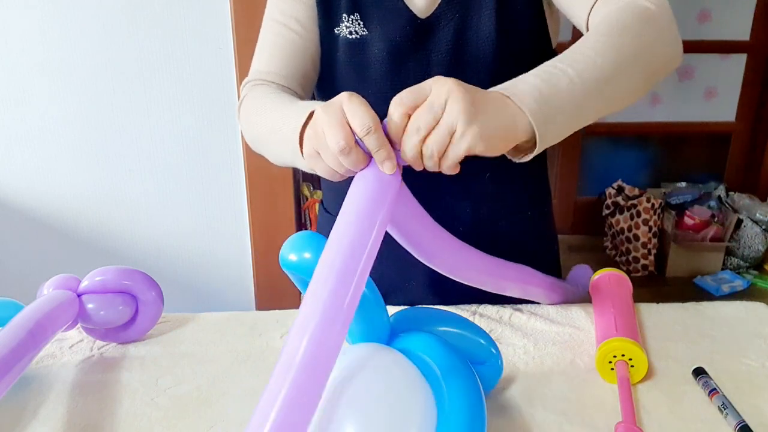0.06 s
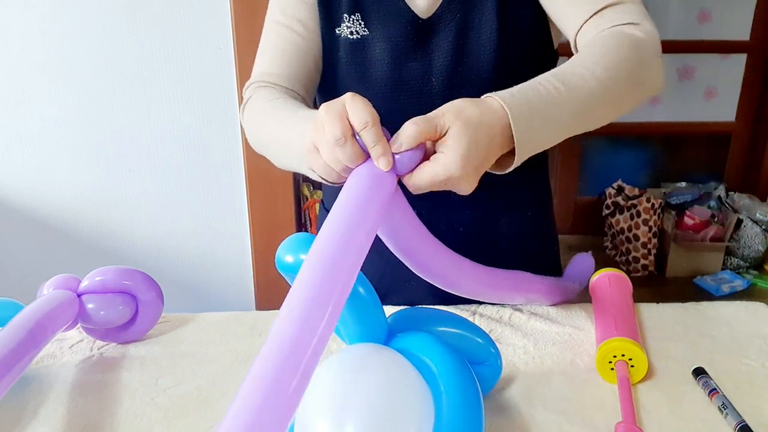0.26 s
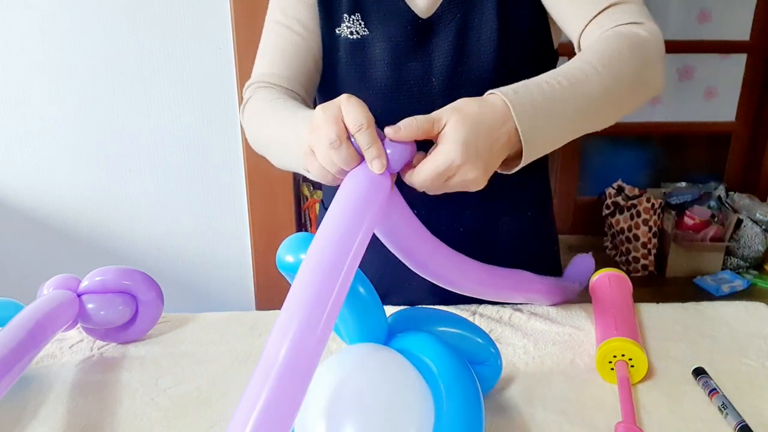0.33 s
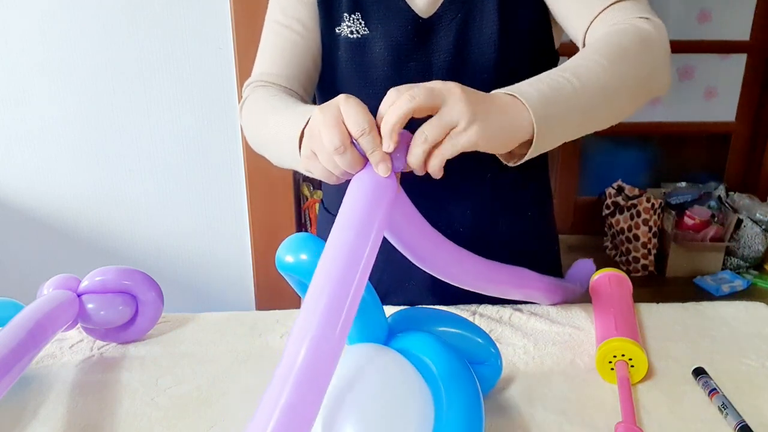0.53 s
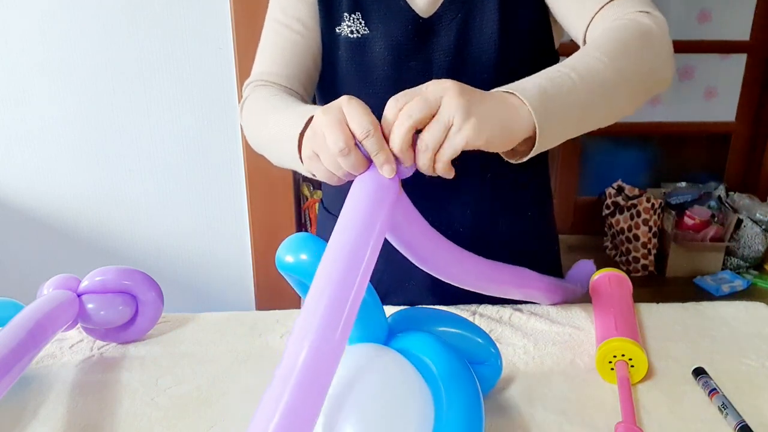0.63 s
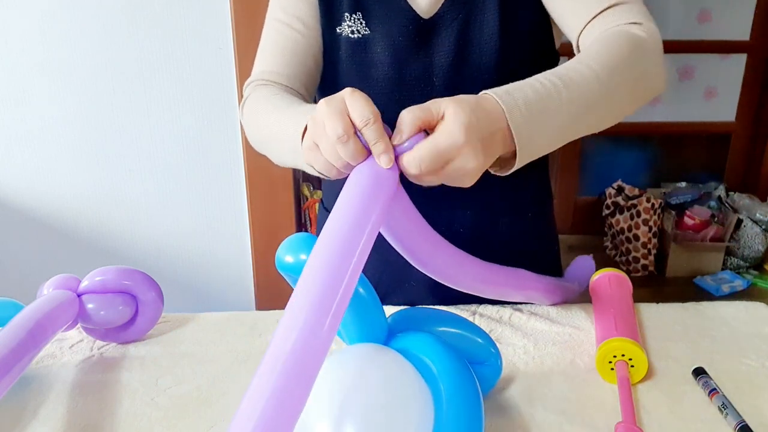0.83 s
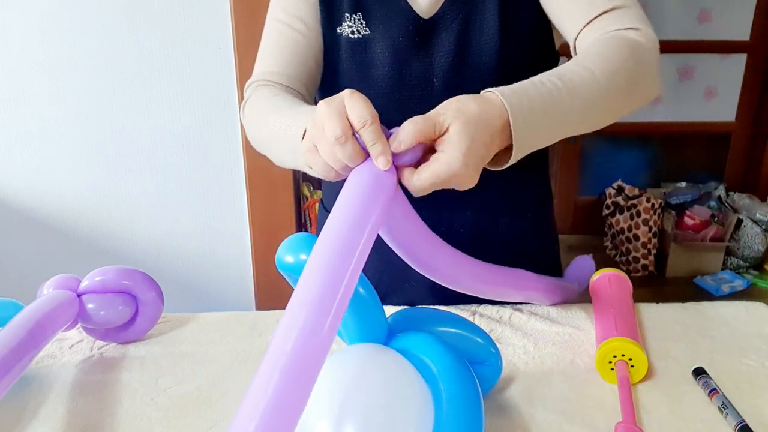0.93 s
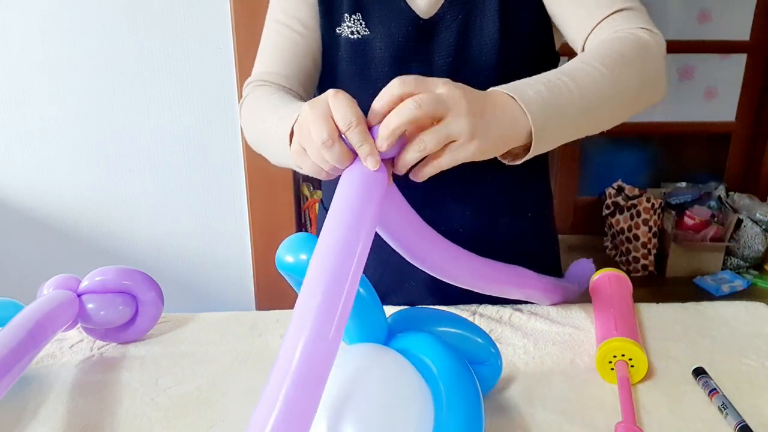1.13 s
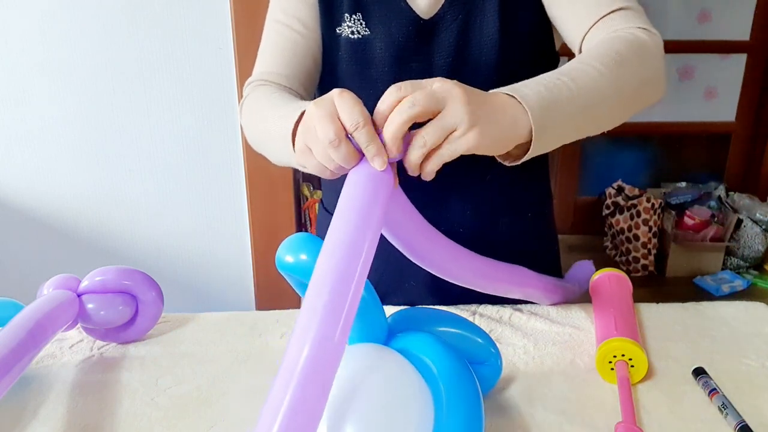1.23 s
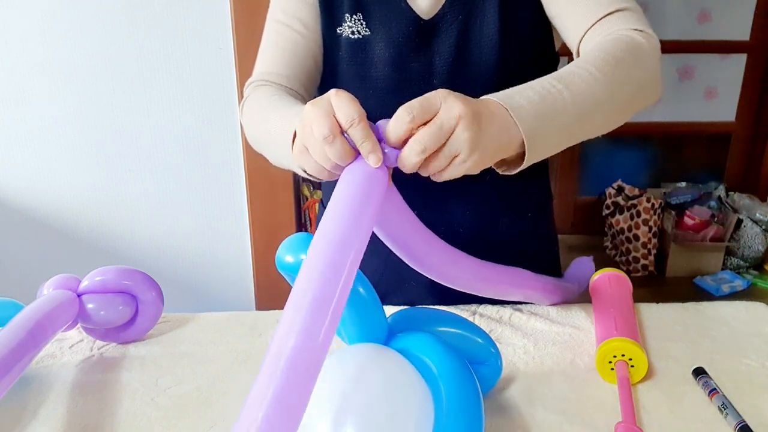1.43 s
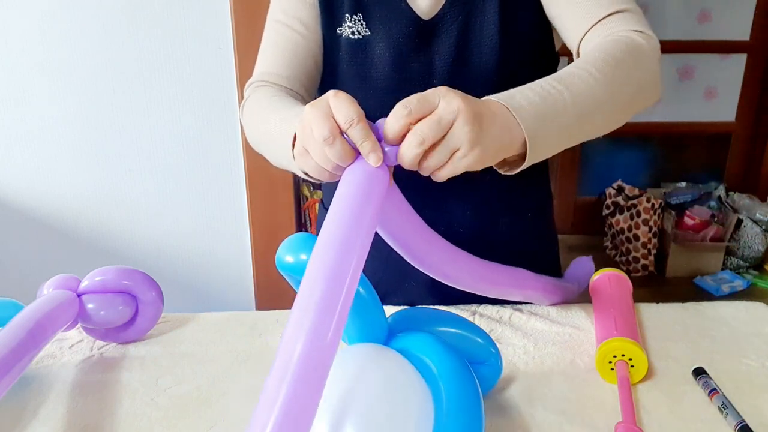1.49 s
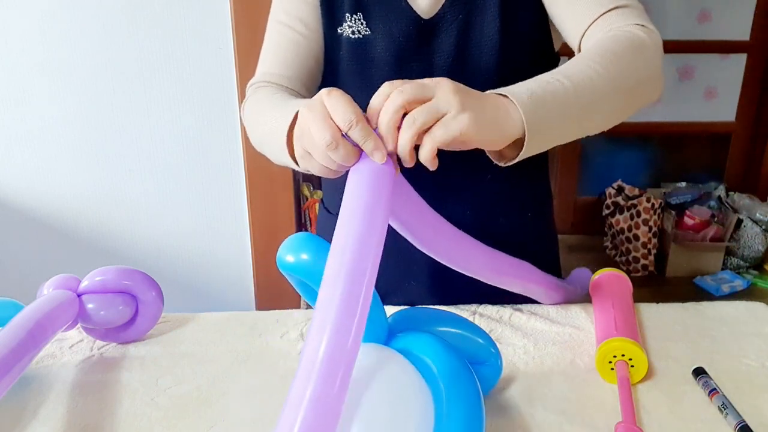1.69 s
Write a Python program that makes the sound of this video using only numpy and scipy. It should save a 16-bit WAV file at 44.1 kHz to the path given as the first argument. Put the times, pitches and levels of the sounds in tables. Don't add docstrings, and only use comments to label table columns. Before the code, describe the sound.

A long rubber balloon twisted by hand, snapping and squeaking in sharp irregular bursts indoors

```python
import sys
import numpy as np
from scipy import signal
from scipy.fft import rfft, irfft
from scipy.io import wavfile
from scipy.ndimage import uniform_filter1d

SR = 44100
rng = np.random.default_rng(int(sys.argv[2]) if len(sys.argv) > 2 else 0)


def how_loud(loudness_db):
    steps = np.asarray(loudness_db, float) / 20
    return 10 ** steps


def int16_out(signal):
    q = np.round(np.clip(np.atleast_2d(signal).T, -1, 1) * 32767)
    wavfile.write(sys.argv[1], SR, q.astype(np.int16))


N = 77175


def evened(x):
    return x / np.sqrt(np.mean(x ** 2) + 1e-20)


def read(points, hz):
    f, value = np.transpose(points)
    return np.interp(np.log(hz + 1), np.log(f + 1), value)


def add(mix, start_s, sound):
    part = mix[max(round(start_s * SR), 0):][:len(sound)]
    part += sound[:len(part)]


def highpass(x, hz):
    return signal.lfilter(*signal.butter(2, hz, "high", fs=SR), x)


def skin(pitch_hz, treble_db, size=512):
    # f/Hz at 2400 Hz pitch, level/dB
    body = [(100, -52), (400, -25), (800, -9), (1400, -2), (3300, 0), (5000, -9), (7000, -11), (9000, -25)]
    # f/Hz, level/dB
    tick = [(3000, -15), (5000, -6.5), (6600, -3.5), (7900, 1), (8600, -13.5), (11000, -10), (15500, -15),
            (17000, -7.5)]
    q, upper_ratio, upper_db, body_db, tick_db = 4.5, 1.55, -8, -10, treble_db - 3.5
    f = abs(np.fft.fftfreq(4 * size, 1 / SR)) + 1

    def mode(hz):
        return 1 / (1 + (q * (f / hz - hz / f)) ** 2)

    power = mode(pitch_hz) + how_loud(2 * upper_db) * mode(pitch_hz * upper_ratio) ** 2
    power = power / (1 + (pitch_hz / 2 / f) ** 4)
    power = power / (1 + (f / pitch_hz / 2) ** 2)
    power = power + how_loud(2 * (body_db + read(body, f * np.sqrt(2400 / pitch_hz))))
    power = power + how_loud(2 * (tick_db + read(tick, f)))
    spectrum = np.exp(np.conj(signal.hilbert(np.log(power) / 2)))
    return np.fft.ifft(spectrum).real[:size]


def snaps():
    # t/s, peak/dB, skin pitch f/Hz, treble/dB
    twists = [(.002, -40, 3800, -4), (.006, -32, 2100, -4), (0.018, -39, 3500, -13), (.038, -20.5, 4000, -2),
              (0.056, -32, 4000, -7), (.068, -34, 4100, -8), (.088, -38, 3000, -12), (0.094, -36, 3200, 8),
              (0.043, -23, 3000, 0.5), (.080, -32.5, 2960, -5), (0.111, -39, 2980, -15),
              (.123, -30, 3040, 4), (0.147, -40, 2800, -14), (.156, -30, 2170, -1), (.162, -39, 2000, -1),
              (0.1668, -25.5, 1490, -7), (.170, -37, 3000, 0), (0.177, -29.5, 2900, -12),
              (0.184, -38, 3000, -13), (0.191, -22.5, 2430, -8), (0.197, -24, 1700, 11),
              (0.2008, -21.5, 1800, -12), (0.2103, -10.5, 2480, -8), (0.217, -15, 2000, 2),
              (.2233, -3.5, 1870, -11), (.246, -11, 2530, 12), (.2665, -20, 2000, 10),
              (0.3456, -22, 1720, -16), (0.351, -20.5, 1540, -14), (.3542, -4, 2680, -5.5),
              (.3546, -16.5, 1190, -6.5), (.372, -25, 2500, -8), (.410, -30.5, 1040, -16),
              (.529, -36.5, 2380, -8), (.542, -38, 1180, 12.5), (0.614, -50, 1270, -2),
              (0.637, -33, 1180, -8), (0.6423, -21.5, 1900, -13), (.7165, -18, 3900, -6),
              (.717, -26, 1850, -9), (.757, -25, 2800, -8), (.762, -19, 3570, 0.5), (0.784, -22.5, 1400, -6),
              (0.806, -19.5, 2510, 7.5), (.822, -33, 3000, 8), (0.8481, -10, 3350, -9),
              (.871, -9.5, 3020, 1), (0.879, -24.5, 4200, -8), (0.885, -37, 2950, 4),
              (.992, -26, 3940, -2), (1.022, -31.5, 2690, -27), (1.014, -27, 2000, -11),
            (1.035, -26.5, 1690, -21), (1.047, -31.5, 2040, -7), (1.058, -38, 3200, -2),
            (1.082, -34, 1080, -12.5), (1.129, -29.5, 1130, -3.5), (1.1326, -26.5, 3900, 16),
            (1.174, -42, 3250, -12), (1.208, -34, 3000, -12), (1.223, -26.5, 1150, -5.5),
            (1.253, -36.5, 1040, -14), (1.268, -37, 1300, -6), (1.298, -33.5, 2500, 0),
            (1.304, -25, 1790, -7), (1.3095, -10, 2760, -0.5), (1.311, -9.5, 1830, -4),
            (1.316, -19, 2400, -2), (1.323, -27, 3050, -19), (1.3285, -21, 3000, -7),
            (1.3355, -16, 2260, -2), (1.338, -15.5, 1930, -12.5), (1.341, -26, 2700, -13),
            (1.358, -42, 3020, 4), (1.377, -23.5, 3360, -1), (1.389, -25, 3100, -7),
            (1.4638, -23.5, 2970, -4.5), (1.530, -27.5, 2880, -2.5), (1.589, -30.5, 2860, 1),
            (1.622, -39, 2970, -2), (1.651, -24, 1995, -8), (1.672, -22, 2920, -7.5),
            (1.678, -28, 1080, -17), (1.684, -31.5, 2960, -8), (1.690, -24.5, 2800, -21),
            (1.70, -35, 1490, -15), (1.71, -35.5, 3580, -19), (1.725, -36, 1600, -5)]
    slip_count, volley_s, rise_s = 14, .0032, .0006
    fade_db, spread_db, settle_db_per_ms = -14, 4, -3
    settle = how_loud(settle_db_per_ms * np.arange(250) / SR * 1000)
    out, rows = np.zeros(N), twists
    draws = rng.random((len(rows), 3, slip_count))
    for (start_s, peak_db, pitch_hz, treble_db), (jitter, sign, loudness) in zip(rows, draws):
        when = (np.arange(slip_count) + jitter) / slip_count
        size = np.sign(sign - .5) * how_loud(fade_db * when + 2 * spread_db * (loudness - 1))
        size = size * np.minimum(when * volley_s / rise_s, 1)
        slips = np.zeros(500)
        np.add.at(slips, np.minimum(when * volley_s * SR, 499).astype(int), size)
        z = rfft(slips)
        slips = irfft(z / uniform_filter1d(abs(z), size=11))
        sound = np.convolve(slips[:250] * settle, skin(pitch_hz, treble_db))
        add(out, start_s, how_loud(peak_db + 1.84) * sound / abs(sound).max())
    return out


def drags():
    # t/s, length/s, level/dB, skin pitch f/Hz, treble/dB
    strokes = [(0, 0.036, -53, 3000, -10), (0.036, 0.086, -51, 2370, -5), (0.124, 0.09, -45.5, 2480, -2),
               (0.193, 0.032, -39, 2000, -5.5), (0.206, .014, -31.5, 1950, -17),
               (0.228, 0.019, -27, 2050, -8.5), (.242, 0.017, -31.5, 2560, -8),
               (.229, 0.0095, -33, 1210, -13), (0.256, 0.12, -40, 2200, -7),
               (0.351, 0.017, -37, 2270, -0.5), (0.363, 0.035, -34, 2320, -14),
               (0.386, 0.087, -47.5, 1130, -2.5), (0.524, 0.071, -51, 1210, -13),
               (0.61, 0.037, -40, 1220, -11.5), (0.738, 0.069, -43.5, 3200, -2),
               (0.837, 0.05, -36.5, 3150, -4), (0.825, 0.031, -46.5, 1470, -32),
               (0.902, 0.1, -46.5, 2780, -10), (1.005, 0.068, -47, 2650, -4.5),
               (1.093, 0.038, -53.5, 986, -18), (1.202, 0.026, -48.5, 1720, -6),
               (1.303, 0.049, -42, 2530, -9), (1.375, 0.07, -49, 3100, 1), (1.448, 0.025, -45.5, 2780, 1),
               (1.577, 0.065, -45.5, 2820, -2.5), (1.661, 0.052, -41.5, 1830, -10)]
    slips_per_s, spread_db, clump_db, edge_s = 4500, 3.2, 3.0, .006
    clumps = evened(uniform_filter1d(rng.standard_normal(N), size=130))
    slips = how_loud(spread_db * np.minimum(rng.exponential(1, N), 4) + clump_db * clumps)
    slips *= (rng.random(N) < slips_per_s / SR) * rng.choice([-1., 1.], N)
    out = np.zeros(N)
    for start_s, length_s, level_db, pitch_hz, treble_db in strokes:
        t = np.arange(0, length_s, 1 / SR)
        first = max(round(start_s * SR), 0)
        pressure = np.clip(np.minimum(t, length_s - t) / edge_s, 0, 1)
        stroke = pressure * slips[first:first + len(t)]
        add(out, start_s, how_loud(level_db) * evened(np.convolve(stroke, skin(pitch_hz, treble_db))))
    return out


def thumps():
    # t/s, level/dB, f/Hz, t60/s
    knocks = [(.02, -53.5, 285.8, 0.81), (0.139, -55, 341, 0.37), (.224, -33.5, 258, 0.051),
              (.23, -43.5, 108, 0.1), (0.354, -36.5, 89, 0.089), (0.627, -49, 557, 0.071),
              (.626, -41.5, 289, 0.09), (0.645, -35.5, 282, 0.086), (.675, -46, 263, 0.071),
              (.38, -46, 287, 0.18), (.85, -40, 690, 0.076), (1.080, -32, 334, 0.015),
              (1.13, -39, 450, 0.0087), (1.2213, -26.5, 480, 0.0068), (1.311, -31, 750, 0.02),
              (1.312, -36, 258, 0.061), (1.337, -25, 850, 0.025), (1.339, -34.5, 260, 0.047),
              (1.403, -56, 293, 0.35)]
    rough = .5
    out, t = np.zeros(N), np.arange(SR // 4) / SR
    wobble = rng.standard_normal((len(knocks), len(t)))
    wobble = evened(uniform_filter1d(uniform_filter1d(wobble, size=300), size=300))
    for (start_s, level_db, hz, t60_s), shake in zip(knocks, wobble):
        phase = 2 * np.pi * hz * t + rough * (shake[::-1] - shake[-1])
        tone = (1 + rough * shake) * np.sin(phase) / (1 + rough * abs(shake[0]))
        rise = np.minimum(t / min(0.0031, t60_s / 12), 1)
        ring = how_loud(level_db - 60 * t / t60_s) * rise * tone
        add(out, start_s, highpass(ring, hz / 3))
    return out


def room(x):
    # f/Hz, t60/s
    decay = [(250, 0.45), (700, 0.34), (1800, 0.25), (4600, 0.41), (9000, 0.17), (15000, 0.21)]
    # f/Hz, correlation/1
    likeness = [(200, 1), (1500, 0.26), (4000, 0.18), (12000, 0.074)]
    gap_s, rise_s, dullness = .003, .0074, 0.05
    taps = np.zeros((2, SR // 2))
    at = np.arange(0, SR // 2 - 10, 10) + rng.integers(0, 10, (2, SR // 20 - 1))
    np.put_along_axis(taps, at, rng.choice([-1., 1.], at.shape), 1)
    hz, t, z = signal.stft(taps, SR, nperseg=256)
    same = np.clip(read(likeness, hz), 0, 1)[:, None]
    z = np.array([z[0], same * z[0] + np.sqrt(1 - same ** 2) * z[1]])
    z = z * how_loud(-60 * t / read(decay, hz)[:, None]) / (1 + hz[:, None] / 4000) ** dullness
    tail = signal.istft(z, SR, nperseg=256)[1]
    tail = tail * np.clip((np.arange(tail.shape[1]) / SR - gap_s) / rise_s, 0, 1)
    return signal.fftconvolve(x[None], tail / np.linalg.norm(tail[0]), axes=1)[:, :N]


def hush():
    # f/Hz, level/dB per Hz
    spectrum = [(25, -13), (60, -2), (285, -8.5), (500, -16.5), (2900, -3.5), (7700, -13.5), (9000, -16.5),
                (15800, -25)]
    level_db, same = -53.5, 0.76
    a, b = rng.standard_normal((2, N))
    z = rfft(np.array([a, same * a + np.sqrt(1 - same ** 2) * b]))
    z = z * how_loud(read(spectrum, np.fft.rfftfreq(N, 1 / SR)))
    return how_loud(level_db) * evened(irfft(z, N))


def scene():
    # t/s, lean to the left/dB
    hands = [
        (0, -1.5),
        (.33, -2.5),
        (.77, -.5),
        (1.2, 2.5),
        (1.45, -.5),
        (1.75, -.5),
    ]
    skin_low_hz, patch_low_hz, patch_db = 200, 2800, -2.5
    room_db, air_to_room_db = -6, -6
    rubber = highpass(snaps() + drags(), skin_low_hz)
    air = thumps()
    patches = highpass(snaps() + drags(), patch_low_hz)
    lean_db = np.interp(np.arange(N) / SR, *np.transpose(hands)) / 2
    direct = (rubber + air) * how_loud([lean_db, -lean_db])
    direct = direct + how_loud(patch_db) * np.array([patches, -patches])
    return direct + how_loud(room_db) * room(rubber + how_loud(air_to_room_db) * air) + hush()


def top_cut(x):
    return signal.sosfilt(signal.butter(12, 16820, fs=SR, output="sos"), x)


def record(dry):
    lag_s, left_db, edge_hz = 8e-5, 2.5, 15900
    hz = np.fft.rfftfreq(N, 1 / SR)
    lean = how_loud(left_db * np.clip(abs(hz - 1000) / 1500 - .3, 0, 1) / 2)
    ports = np.array([lean, np.exp(-2j * np.pi * hz * lag_s) / lean])
    ports = ports * np.clip((edge_hz - hz) / 900 + 1, 0, 1) ** 3
    return top_cut(irfft(rfft(dry) * ports, N))


dry = scene()
out = record(dry)
int16_out(out)
```